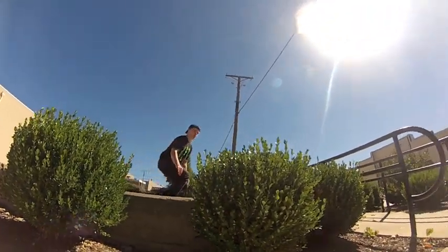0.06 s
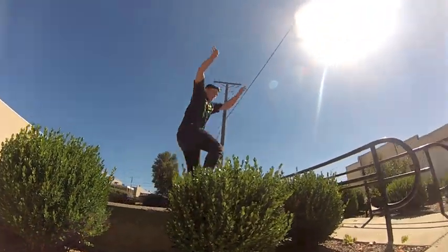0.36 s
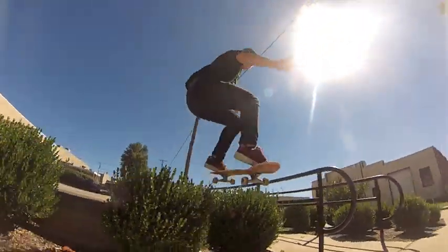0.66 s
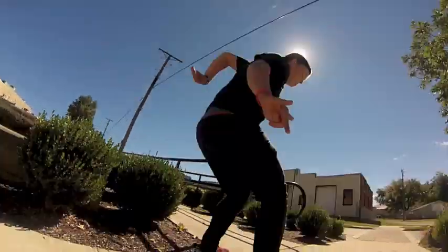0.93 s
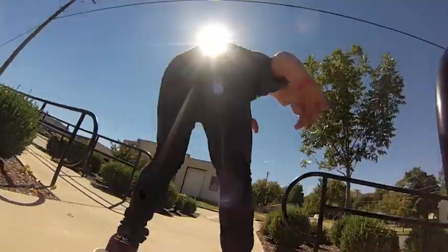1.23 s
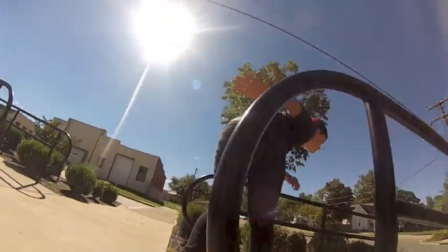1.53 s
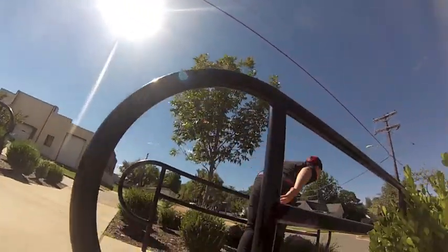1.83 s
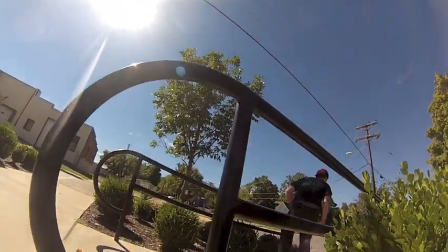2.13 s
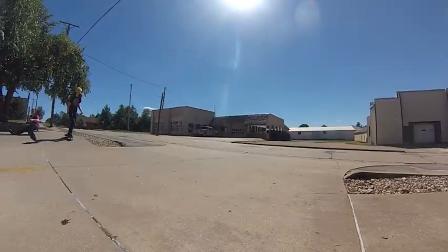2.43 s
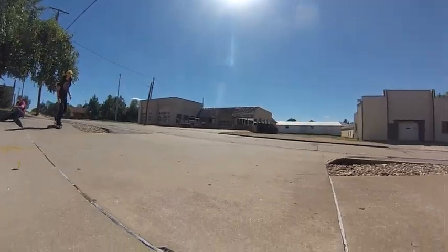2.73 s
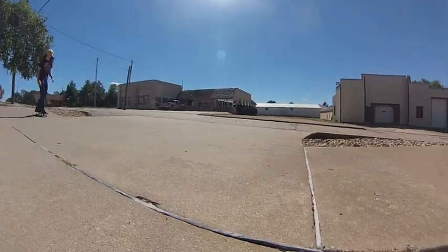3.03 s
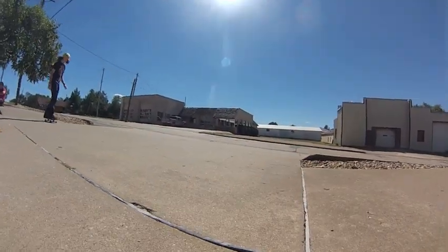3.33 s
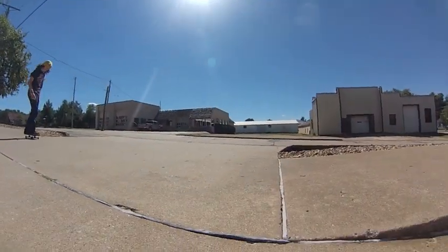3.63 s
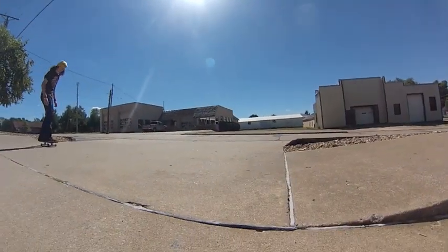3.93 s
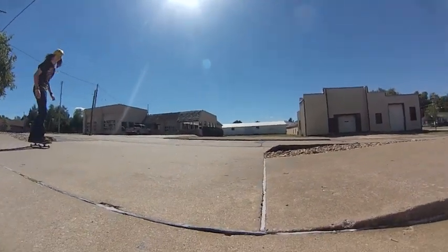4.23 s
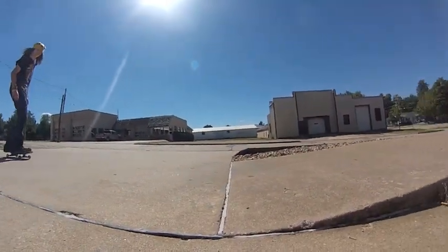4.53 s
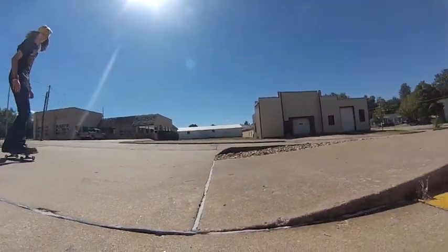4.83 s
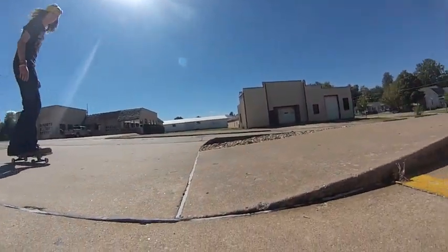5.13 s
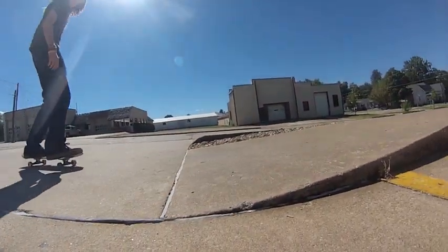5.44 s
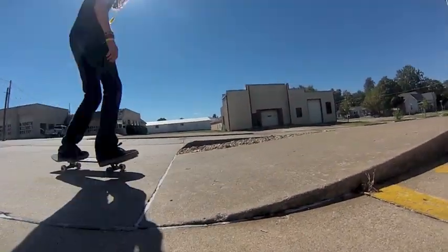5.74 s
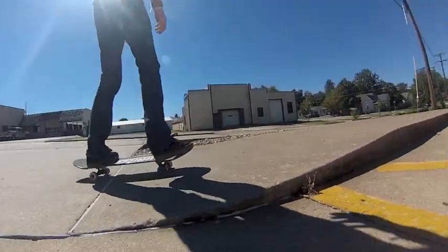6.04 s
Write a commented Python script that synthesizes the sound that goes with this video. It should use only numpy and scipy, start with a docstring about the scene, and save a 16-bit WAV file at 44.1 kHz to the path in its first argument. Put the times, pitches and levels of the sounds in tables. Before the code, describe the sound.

Wind rumbles on a hand-held microphone outdoors over a faint hush. A skateboard rolls up quietly on rough concrete, and its tail pops with a wooden crack at 0.4 seconds. The bearings whirr faintly in the air, then at 0.9 seconds the board slams down close by with a brief metallic ring, the loudest sound. It rolls on with a gritty hum, clacking over slab joints from 1.3 to 2 seconds as it recedes, and clicks on a pebble at 2.3. Everything fades out for an instant at 2.4 seconds. The wind returns stronger, and a second skateboard approaches from far off, ticking on pebbles around 3.1 and 4.6 seconds and briefly scrubbing its wheels at about 3.8 and 4.2. Its rolling grows fuller near the end, clacking over joints at 5.9 and 6.1 seconds. A few soft, dull bumps shake the microphone along the way.

```python
"""Two skateboard rides on outdoor concrete, with wind rumbling on a hand-held microphone throughout.
The first board rolls up, grit driving the resonances of its deck, wheels and trucks. Its tail pops on
the ground, it flies with whirring bearings, slams down close by and clatters away over slab joints.
After a brief fade a second board rolls up from far off, striking pebbles and scrubbing its wheels in a
turn, then clacks over joints as it comes near. Now and then a dull bump shakes the microphone."""
import sys
import numpy as np
from scipy import signal
from scipy.fft import rfft, irfft, next_fast_len
from scipy.io import wavfile
from scipy.ndimage import map_coordinates

SR = 44100
rng = np.random.default_rng(int(sys.argv[2]) if len(sys.argv) > 2 else 0)


def int16_out(signal):
    """Quantize to a 16-bit WAV file."""
    q = np.round(np.clip(np.atleast_2d(signal).T, -1, 1) * 32767)
    wavfile.write(sys.argv[1], SR, q.astype(np.int16))


N = 276948
TIME = np.arange(N) / SR
SHORT = np.arange(SR // 5) / SR  # time axis of one impact

# the tail snapping on the ground, then the board rebounding: start_s, level_db, scuff_ratio
POP_CONTACTS = [(0.391, -42, 0.75), (.3975, -43.5, 4.7), (0.4022, -51.5, 2.5)]
# the contacts of the landing: start_s, deck_db, wheel_db, truck_db, tick_db
LANDING_CONTACTS = [(0.8976, -37.5, -41, -34, -42), (0.8993, -30, -21, -18.5, -38.5),
                    (.9027, -19, -32.5, -34, -51), (0.9063, -39.5, -27, -28.5, -49.5),
                    (0.9197, -37.5, -35.5, -38.5, -53.5)]
POP_S, SLAM_S, SECOND_RIDE_S = POP_CONTACTS[0][0], LANDING_CONTACTS[1][0], 2.405
# modes of the board rolling under the rider's weight: pitch_hz, width_hz, gain_db
DECK_DRONE = [(196, 490, -4), (470, 110, -1.5), (619, 170, 3.5), (810, 280, -5)]
WHEEL_HUM = [(1075, 200, -13.5), (1335, 170, -0.5), (1506, 190, -1)]
TRUCK_RATTLE = [(2157, 260, -6), (2510, 300, -12.5)]
SIZZLE_MODES = [(3560, 560, -10.5), (4850, 830, 7), (6800, 600, 5), (7650, 700, -4), (11500, 2200, -11.5)]


def amp(db):
    """Amplitude grows tenfold for every 20 dB."""
    return 10 ** (np.asarray(db) / 20)


def unit(x):
    """Normalisation to an rms of 1."""
    return x / np.sqrt(np.mean(x ** 2) + 1e-20)


def curves(rows):
    """Linear interpolation: one value per sample for each column after the time."""
    times_s, *columns = np.transpose(rows)
    return [np.interp(TIME, times_s, column) for column in columns]


def wobble(knots_per_s):
    """Slow random modulation: a spline through Gaussian knots."""
    knots = rng.standard_normal(int(N * knots_per_s / SR) + 4)
    return map_coordinates(knots, [TIME * knots_per_s])


def add(track, start_s, sound):
    """Superposition: a sound sums into the track from its start time."""
    part = track[round(start_s * SR):][:len(sound)]
    part += sound[:len(part)]


def filtered(x, response):
    """Zero-phase filtering: the spectrum of x times a function of frequency."""
    size = next_fast_len(N + SR // 2)
    return irfft(rfft(x, size) * response(np.fft.rfftfreq(size, 1 / SR)), size)[:N]


def noise(spectrum):
    """Spectral shaping: noise of rms 1 coloured by rows of frequency_hz, gain_db."""
    knots_hz, db = np.transpose(spectrum)
    white = rng.standard_normal(N)
    return unit(filtered(white, lambda hz: amp(np.interp(np.log(hz + 1), np.log(knots_hz), db))))


def resonate(x, modes, skirt, size=8192):
    """Forced vibration: x drives a set of resonances whose flanks steepen with skirt."""
    hz = np.fft.rfftfreq(size, 1 / SR) + 1
    power = sum(amp(db) ** 2 / (1 + ((hz / pitch_hz - pitch_hz / hz) * pitch_hz / width_hz) ** 2) ** skirt
                for pitch_hz, width_hz, db in modes)
    # folding the cepstrum gives a causal, minimum-phase response
    cepstrum = irfft(np.log(power + 1e-10) / 2)
    cepstrum[1:size // 2] *= 2
    cepstrum[size // 2 + 1:] = 0
    return signal.fftconvolve(x, irfft(np.exp(rfft(cepstrum))))[:len(x)]


def grit(per_second, spread_db):
    """Shot noise: stones in the concrete meet the wheels as random pulses of uneven size."""
    hit = rng.random(N) < per_second / SR
    return hit * rng.choice([-1, 1], N) * amp(spread_db * rng.standard_normal(N))


def contact(scuff, scuff_t60, soft_hz):
    """Contact force: a cushioned push, weak above soft_hz, plus a crunch of grit that builds and dies."""
    push = np.exp(-2 * np.pi * soft_hz * SHORT)
    attack = 1 - np.exp(-SHORT / 0.00076)
    crunch = rng.standard_normal(len(SHORT)) * amp(-60 * SHORT / scuff_t60) * attack
    return push / push.sum() + scuff * crunch / np.linalg.norm(crunch)


def blow(force, parts, levels_db, skirt):
    """Impact excitation: each part rings with the energy of 20 ms of steady sound at its level."""
    rings = (resonate(force, modes, skirt) for modes in parts)
    return sum(amp(db) * ring * np.sqrt(SR / 50) / np.linalg.norm(ring)
               for ring, db in zip(rings, levels_db))


def wind():
    """Turbulence: eddies buffet the microphone, and stronger gusts reach higher in pitch."""
    # strength of the breeze: time_s, level_db
    breeze = [(0, -44), (1.1, -39.5), (1.7, -43), (2.1, -41), (2.5, -35), (4.2, -33), (4.8, -35.5),
              (6.28, -36)]
    # gusts over the breeze: centre_s, half_length_s, lift_db
    gusts = [(.34, .05, 4), (.74, .03, 5), (2.24, .06, 9), (2.66, .03, 10), (2.78, 0.03, 8),
             (3.22, 0.054, 3.5), (3.77, .08, 7), (5.08, 0.098, 5)]
    gust_db = sum(db * np.exp(-((TIME - centre_s) / half_s) ** 2 / 2) for centre_s, half_s, db in gusts)
    eddy_db = 1.5 * wobble(knots_per_s=16)
    strength = amp(curves(breeze)[0] - 1.55 + gust_db + eddy_db)
    buffet = noise([(10, -20.5), (20, -2), (32, -3), (50, -3.5), (66, -16), (92, -32), (200, -51.5),
                    (440, -120)])
    flutter = noise([(30, -29.5), (55, 4.5), (75, -5), (105, -23), (280, -36), (500, -40), (1200, -120)])
    return strength * buffet + amp(-46.5) * unit(strength ** 2) * flutter


def outdoor_hush():
    """Ambient noise: a distant, nearly steady hush whose spectrum falls toward the treble."""
    # strength of the hush: time_s, level_db
    levels = [(0, -55.5), (.6, -56), (2.3, -55.5), (2.6, -55.5), (3.5, -55), (6.28, -54)]
    # its spectral density: frequency_hz, gain_db
    spectrum = [(60, 4.5), (150, 1.5), (290, -2), (550, -9), (1000, -12), (2000, -18.5), (4000, -21.5),
                (8000, -26.5), (12000, -29), (15000, -32.5)]
    return amp(curves(levels)[0] + .4 * wobble(3.7)) * noise(spectrum)


def ride_envelopes():
    """Amplitude envelopes of deck, wheels and trucks, and the share of wheel power in the upper mode."""
    # wheel hum on rough concrete: time_s, level_db, upper_share
    run_up = [(0, -71, 0), (.26, -60.5, 0.17), (.39, -65.5, 0.5)]
    roll_away = [(.95, -56.5, .8), (1.01, -52.5, 0.59), (1.07, -56, 0.85), (1.18, -44, 0.28),
                 (1.28, -53, .3), (1.43, -54.5, 0.23), (1.7, -59, .1), (1.97, -62.5, .3), (2.3, -63, 0.51)]
    approach = [(2.5, -81, .25), (3.1, -63.5, .3), (3.7, -68, .5), (4.25, -60.5, .7), (4.45, -63, .4),
                (4.7, -60.5, 0.23), (5.2, -61.5, .05), (5.7, -58, 0.83), (6.28, -61.5, 0.98)]
    # offsets from the wheel envelope in run-up, flight, roll-away and approach: deck_db, truck_db
    balance = [(2.5, -11.5), (-6.5, -1), (6, -5), (-8, -18)]
    # a near board shows more of its trucks: nearest_s, half_length_s, deck_lift_db, truck_lift_db
    passes = [(1.167, 0.26, 0.5, 3.5), (6.1, .3, 11, 17)]
    # in the air the wheels hum on, fading as they slow
    free_hum_db, sag_db_per_s, free_upper_share = -61, 10.5, 0.46
    flight = [free_hum_db - sag_db_per_s * (TIME - POP_S), np.full(N, free_upper_share)]
    stretch = np.searchsorted([POP_S, SLAM_S, SECOND_RIDE_S], TIME)
    hum_by_stretch = np.array([curves(run_up), flight, curves(roll_away), curves(approach)])
    wheel_db, upper_share = np.choose(stretch, hum_by_stretch)
    near_db = sum(np.outer(lift_db, 1 / (1 + ((TIME - nearest_s) / half_s) ** 2))
                  for nearest_s, half_s, *lift_db in passes)
    deck_db, truck_db = wheel_db + np.array(balance)[stretch].T + near_db
    return deck_db, wheel_db, truck_db, np.clip(upper_share, 0, 1)


def rolling():
    """Roughness excitation: grit shakes deck, wheels and trucks; rougher patches make them flutter."""
    deck_db, wheel_db, truck_db, upper_share = ride_envelopes()
    patches_db = .8 * wobble(13)
    ground = grit(per_second=2000, spread_db=3) * amp(2.1 * wobble(35))
    deck = amp(deck_db - 5) * unit(resonate(ground, DECK_DRONE, skirt=1.7))
    low_hum = unit(resonate(grit(per_second=1400, spread_db=5), WHEEL_HUM[:2], skirt=1.36))
    high_hum = unit(resonate(grit(per_second=1400, spread_db=5), WHEEL_HUM[2:], skirt=1.36))
    wheels = amp(wheel_db) * (np.sqrt(1 - upper_share) * low_hum + np.sqrt(upper_share) * high_hum)
    trucks = amp(truck_db - 0.5) * unit(resonate(ground, TRUCK_RATTLE, skirt=1.5))
    # the fine sizzle needs both weight on the deck and a rattling truck, and grows with the wheel hum
    loud_roll_db = -50.5
    sizzle_db = (deck_db + truck_db) / 2 - 17.5 + 0.23 * (wheel_db - loud_roll_db)
    sizzle = amp(sizzle_db) * unit(resonate(ground, SIZZLE_MODES, skirt=1.25))
    return amp(patches_db) * (deck + wheels + trucks + sizzle)


def bearings():
    """Random excitation: balls rattling in their races give a thin, high whirr that swells at times."""
    # bearing modes: pitch_hz, width_hz, gain_db
    modes = [(6550, 260, 1), (7400, 660, -14.5)]
    # swells of bearing whirr, in the air and while rolling: start_s, end_s, level_db
    whirr_swells = [(.42, 0.903, -75), (1.15, 1.5, -72.5), (2.105, 2.26, -69), (5.8, 6.28, -75)]
    floor_db, ramp_s = -85.5, .05
    swell = sum(amp(db) * np.clip(np.minimum(TIME - start_s, end_s - TIME) / ramp_s + .5, 0, 1)
                for start_s, end_s, db in whirr_swells)
    balls = rng.standard_normal(N) * amp(2.5 * wobble(40) + 1.5 * wobble(11))
    return np.maximum(swell, amp(floor_db)) * unit(resonate(balls, modes, skirt=1.1))


def tail_pop():
    """Hard impact: the wooden tail cracks on the concrete and scrapes as it lifts."""
    # modes of the unloaded board: pitch_hz, width_hz, gain_db
    modes = [(917, 170, 0), (1360, 280, 3.5), (2060, 400, 0), (2640, 310, 0.5), (3470, 300, -0.5),
             (4070, 400, -13), (4900, 690, -16), (6500, 450, -19), (7640, 900, -23)]
    track = np.zeros(N)
    for start_s, db, scuff in POP_CONTACTS:
        force = contact(scuff, scuff_t60=0.057, soft_hz=4000)
        add(track, start_s, blow(force, [modes], [db], skirt=1.6))
    return track


def landing():
    """Impact and free decay: wheels and deck slam down, the rider's weight thumps, the steel rings on."""
    # modes of the slammed board, part by part: pitch_hz, width_hz, gain_db
    deck = [(250, 50, -10), (502, 100, 2.5), (597, 100, -14), (722, 95, -2), (983, 160, -20)]
    wheels = [(1340, 67, 1), (1445, 150, -11.5), (1660, 62, -11)]
    trucks = [(1896, 85, -1), (2046, 90, 0), (2223, 80, -5), (2330, 110, -3), (2450, 110, -6),
              (2592, 110, -1), (2742, 100, -6), (2902, 90, -8), (3550, 400, -25)]
    ticks = [(3800, 500, -11), (4500, 700, 5.5), (5830, 1000, -7), (6620, 740, 2.5), (7620, 770, -2),
             (11700, 2800, -11.5)]
    # lightly damped modes of the steel: pitch_hz, level_db, t60_s
    steel = [(1338, -44, .3), (1372, -42, .4), (1615, -52, .35), (2406, -56, .3), (4548, -53, .2)]
    track = np.zeros(N)
    for start_s, *levels_db in LANDING_CONTACTS:
        force = contact(scuff=.15, scuff_t60=.024, soft_hz=1100)
        add(track, start_s, blow(force, (deck, wheels, trucks, ticks), levels_db, skirt=1.36))
    weight = contact(scuff=0.075, scuff_t60=0.08, soft_hz=700)
    thump_modes = [(80, 40, 0.004), (133, 38, 0)]
    add(track, SLAM_S, blow(weight, [thump_modes], levels_db=[-33], skirt=1.4))
    # loose washers and bolts chatter between the contacts
    chatter = contact(scuff=6, scuff_t60=0.099, soft_hz=1000)
    add(track, SLAM_S, blow(chatter, [trucks, ticks], levels_db=[-33, -41], skirt=1.47))
    t = np.arange(SR) / SR
    ring = sum(amp(db - 60 * t / t60_s) * np.sin(2 * np.pi * hz * t) for hz, db, t60_s in steel)
    add(track, SLAM_S, ring)
    return track


def clack(strength_db, deck_db, truck_db, sizzle_db, scuff):
    """Coupled vibration: a loaded wheel strikes an edge, and the other parts answer relative to it."""
    # how readily each part answers a blow: deck_db, wheel_db, truck_db, sizzle_db
    response_db = [-4, -7, -4.5, 0]
    force = contact(scuff, scuff_t60=.038, soft_hz=1500)
    levels_db = strength_db + np.array([deck_db, 0, truck_db, sizzle_db]) + response_db
    return blow(force, (DECK_DRONE, WHEEL_HUM, TRUCK_RATTLE, SIZZLE_MODES), levels_db, skirt=1.67)


def slab_joints():
    """Paired impacts: an axle crosses a joint at a slant, one wheel after the other."""
    # crossings, with the second wheel's lag and extra hardness:
    # start_s, lag_s, strength_db, deck_db, truck_db, sizzle_db, harder_db
    crossings = [(1.299, .006, -35, -3, 0.5, -20, 1.5), (1.339, .021, -39.5, 7, -7.5, -22, 4.5),
                 (1.517, .015, -41, 3, -2.5, -16.5, 0.5), (1.877, .013, -46.5, 2.5, -2, -21, -3),
                 (2.013, .011, -47.5, -2.5, -4, -17.5, -1), (5.897, .019, -43, -6, -15, -23, -0.5),
                 (6.094, .025, -44.5, -7, -8.5, -21, 6)]
    track = np.zeros(N)
    for start_s, lag_s, strength_db, deck_db, truck_db, sizzle_db, harder_db in crossings:
        for hit_s, hard_db in ((start_s, 0), (start_s + lag_s, harder_db)):
            # a harder hit thuds less and rattles more
            hit = clack(strength_db, deck_db - hard_db, truck_db + hard_db, sizzle_db + hard_db, scuff=.98)
            add(track, hit_s, hit)
    return track


def handling_bumps():
    """Structure-borne sound: soft knocks ring the low modes of the microphone's housing."""
    # knocks on the housing: start_s, level_db
    knocks = [(2.129, -55), (2.758, -48), (3.106, -57.5), (3.198, -50.5), (5.9, -49)]
    housing_modes = [(130, 55, -0.47), (272, 170, -0.98)]
    push = signal.unit_impulse(len(SHORT))
    track = np.zeros(N)
    for start_s, db in knocks:
        add(track, start_s, blow(push, [housing_modes], [db], skirt=1.8))
    return track


def pebbles():
    """Single impacts: a pebble under one wheel rings mostly that wheel."""
    # pebble strikes: start_s, strength_db
    strikes = [(2.217, -46), (2.303, -37), (3.033, -42), (3.243, -43), (4.546, -47), (4.58, -49.5),
               (4.678, -49), (5.723, -48.5), (6.131, -45)]
    track = np.zeros(N)
    for start_s, strength_db in strikes:
        add(track, start_s, clack(strength_db, deck_db=-11, truck_db=-15, sizzle_db=-27, scuff=1.1))
    return track


def wheel_scrubs():
    """Sliding friction: urethane wheels rasp sideways as the far rider steers."""
    # sideways slips: centre_s, half_length_s, level_db
    slips = [(3.776, 0.023, -56), (3.81, 0.0079, -56.5), (4.155, 0.02, -53.5), (4.222, 0.0083, -63)]
    # resonances of the rasp: pitch_hz, width_hz, gain_db
    modes = [(1560, 550, -2), (2160, 180, -6.5)]
    swell = sum(amp(db) * np.exp(-((TIME - centre_s) / half_s) ** 2 / 2) for centre_s, half_s, db in slips)
    return swell * unit(resonate(grit(per_second=710, spread_db=3.5), modes, skirt=2.7))


def yard_scatter(x, t60_s, dull_hz):
    """Diffuse reflection: kerbs, hedges and walls return a dull, exponentially decaying tail."""
    t = np.arange(SR // 2) / SR
    tail = rng.standard_normal(len(t)) * amp(-60 * t / t60_s) * (1 - np.exp(-t / 0.01))
    reflected = signal.fftconvolve(x, tail / np.linalg.norm(tail))[:N]
    return filtered(reflected, lambda hz: 1 / np.hypot(1, hz / dull_hz))


def scene():
    """Superposition of both rides, their weak reflections, the wind, the hush and the bumps."""
    board = rolling() + wheel_scrubs() + bearings() + tail_pop() + slab_joints() + pebbles() + landing()
    reflections = amp(-30.5) * yard_scatter(board, t60_s=.3, dull_hz=4000)
    return (board + reflections + wind() + outdoor_hush() + handling_bumps())[None]


def record(dry):
    """Gain envelope and band limit: the sound fades briefly between the rides and loses its top treble."""
    # the fade away and back: time_s, gain
    fade = [(0, 0.91), (2.32, 0.93), (2.403, 0), (2.412, 0.035), (2.48, 0.86), (6.3, 0.86)]
    top_hz = 15350
    faded = dry[0] * np.clip(curves(fade)[0], 0, 1)
    return filtered(faded, lambda hz: hz < top_hz)[None]


dry = scene()
out = record(dry)
int16_out(out)
```